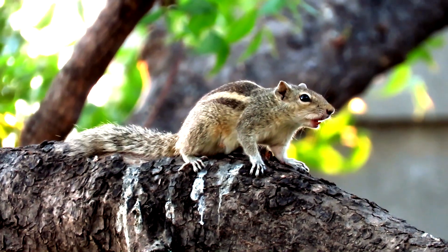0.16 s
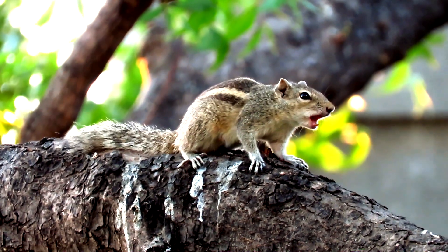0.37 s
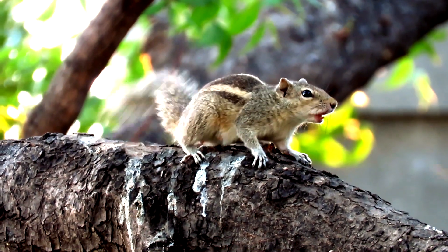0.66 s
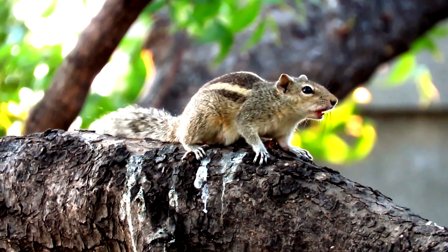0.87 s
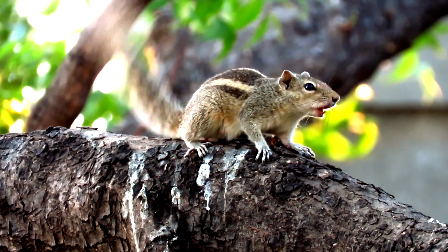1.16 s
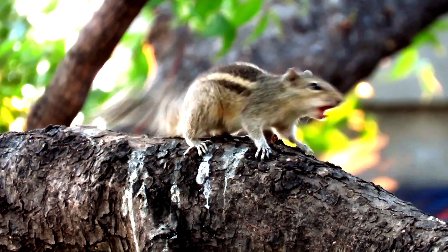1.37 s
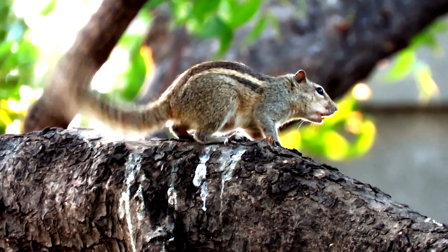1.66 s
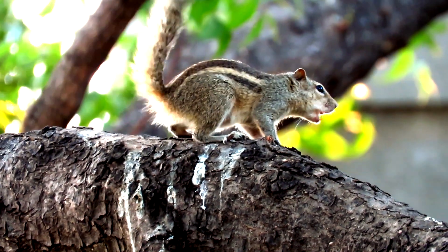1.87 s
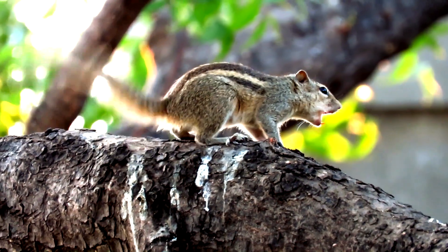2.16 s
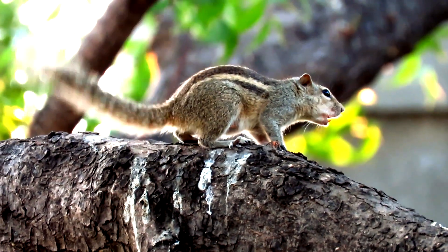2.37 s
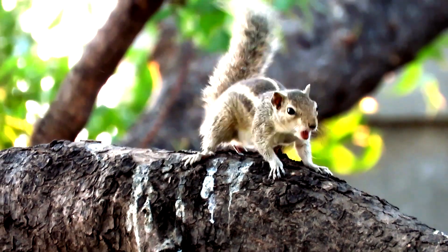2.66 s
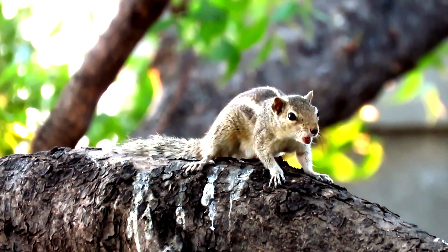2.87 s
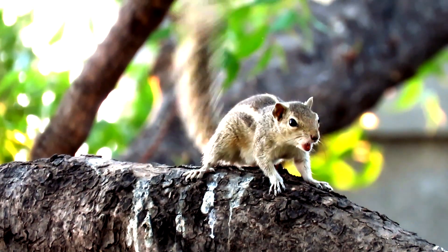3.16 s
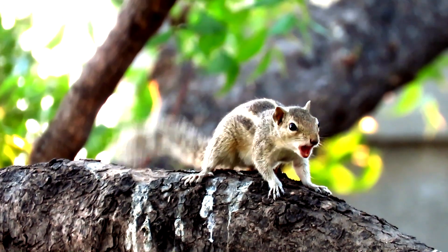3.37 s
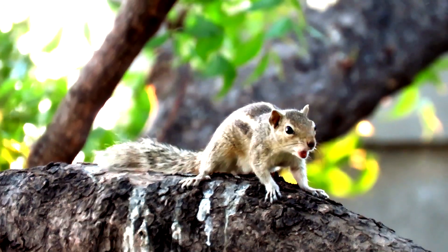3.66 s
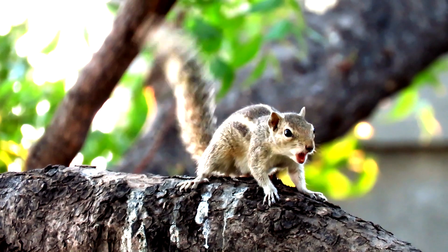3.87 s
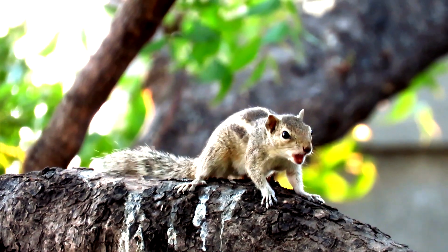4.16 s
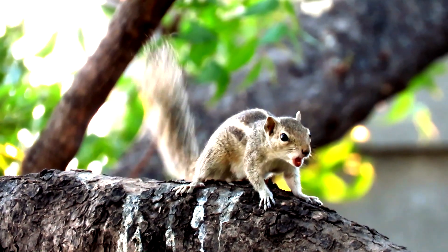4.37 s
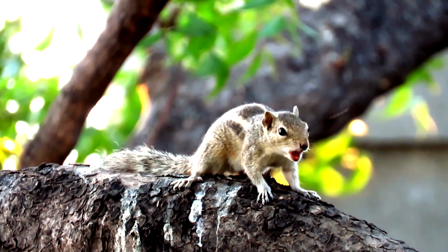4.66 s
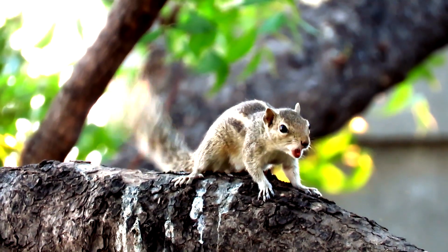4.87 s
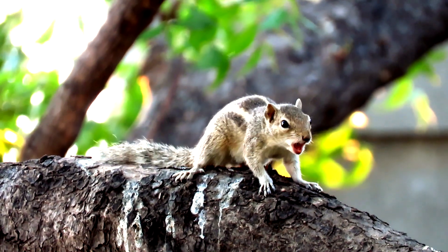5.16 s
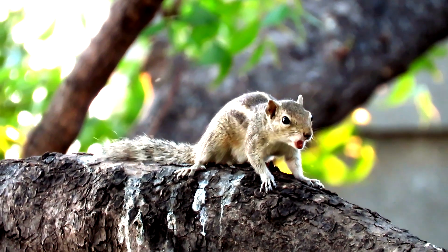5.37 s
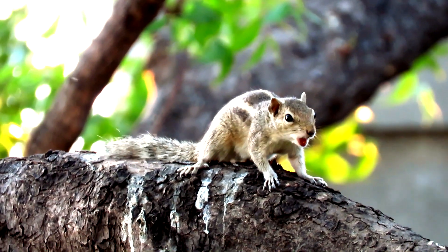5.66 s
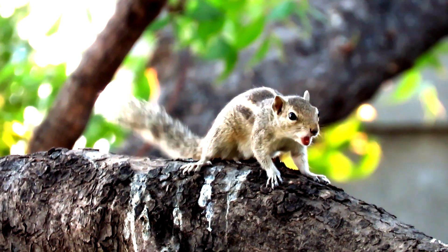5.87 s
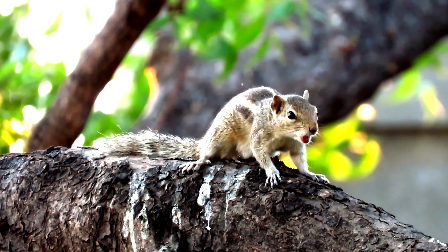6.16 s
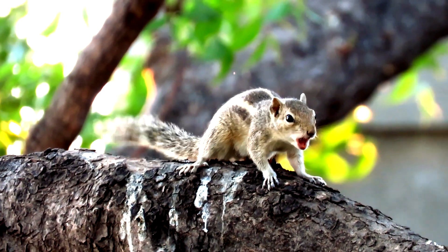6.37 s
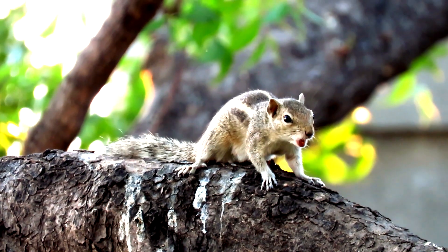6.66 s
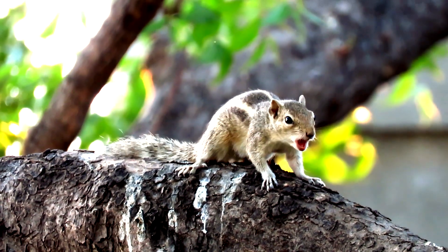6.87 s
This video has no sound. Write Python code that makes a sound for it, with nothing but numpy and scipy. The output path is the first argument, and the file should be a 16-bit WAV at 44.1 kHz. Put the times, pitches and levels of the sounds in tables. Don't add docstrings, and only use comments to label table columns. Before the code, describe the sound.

Close on a branch, a small squirrel repeats short, pure, piercing whistles roughly every half second, slightly slower toward the end. Small throaty gulps follow many of them, and claws brush the bark. Yard walls throw back quick echoes and a bright tail. Several crows caw hoarsely further away, mostly early and again near the end, with a few thin bird peeps. A far engine hums beneath soft street rumble and hiss.

```python
import sys
import numpy as np
from scipy import signal
from scipy.fft import rfft, irfft
from scipy.io import wavfile
from scipy.ndimage import uniform_filter1d

SR = 44100
rng = np.random.default_rng(int(sys.argv[2]) if len(sys.argv) > 2 else 0)


def store_wav(level_fs):
    pcm = np.round(np.clip(np.atleast_2d(level_fs), -1, 1) * 32767)
    wavfile.write(sys.argv[1], SR, pcm.T.astype(np.int16))


def invert_db(level):
    return 10 ** (np.asarray(level, dtype=float) / 20)


N = 309582
TIME = np.arange(N) / SR


def whistles():
    # start in seconds, length in seconds, pitch in Hz, fundamental in dB, octave in dB.
    chirps = [(0.406, 0.15, 4329, -25, -29), (1.015, .15, 4350, -16.5, -21), (1.43, 0.12, 4485, -20.5, -19),
              (1.826, 0.125, 4426, -20.5, -24.5), (2.195, 0.12, 4525, -17.5, -21.5),
              (2.63, 0.13, 4335, -17, -22.5), (3.049, 0.11, 4550, -16.5, -14.5),
              (3.417, 0.12, 4486, -20, -13), (3.826, 0.13, 4449, -20.5, -14),
              (4.269, 0.14, 4404, -21.5, -16), (4.756, 0.14, 4380, -21.5, -18.5),
              (5.223, 0.14, 4365, -19, -20), (5.782, 0.14, 4360, -22, -23), (6.365, 0.14, 4320, -22.5, -26),
              (6.88, 0.15, 4296, -20.5, -25)]
    # crest of fundamental (0-1), its level at the start in dB, crest of octave (0-1),
    # glide as share of pitch, third partial in dB.
    delivery = [(0.9, -4, 0.44, -0.0059, -41), (0.67, -13.5, 0.67, 0.0143, -39.5),
                (0.6, -7.5, 0.44, -0.023, -42), (0.9, -12, 0.63, -0.05, -47.5),
                (0.8, -14, 0.92, 0.0185, -40), (.86, -15, .55, -.002, -47), (0.8, -14, 0.72, 0.0074, -41),
                (0.9, -11.5, 0.8, 0.046, -42.5), (0.82, -10, 0.7, 0.0245, -44),
                (0.9, -9, 0.54, 0.0173, -47.5), (0.47, -17, 0.61, 0.0164, -48.5),
                (0.56, -16, 0.56, 0.0278, -47), (0.44, -16, 0.6, 0.021, -49),
                (0.66, -15.5, 0.54, 0.0132, -47), (0.7, -13.5, 0.57, 0.03, -44)]
    # scoop up to pitch as share, overshoot as share, moment the fundamental falters (0-1),
    # level change there in dB, time constant of the final hook in seconds.
    attacks = [(0.1, 0.0038, 0.45, -7, 0.0154), (0.023, 0.00088, 0.46, -12, 0.0124),
               (0.092, 0.0015, 0.8, 2.5, 0.0235), (0.17, .035, 0.8, 2, 0.0073),
               (0.07, 0.012, 0.65, -6, 0.01245), (.08, .05, .4, -1, .006), (0.11, 0.031, 0.47, -23, 0.016),
               (0.054, 0.0056, 0.4, -6, 0.0157), (0.064, 0.0087, 0.3, -3.5, 0.013),
               (0.062, 0.0069, 0.62, -6.5, 0.0161), (0.098, 0.00065, 0.88, 4, 0.0142),
               (0.081, 0.00072, 0.54, -6.5, 0.0118), (0.09, 0.0037, 0.39, -12, 0.0194),
               (0.0745, 0.00066, 0.6, -14, 0.0123), (.08, .001, 0.7, -8.5, 0.011)]
    # falter length in seconds, final hook as share of pitch, crest of third partial (0-1),
    # its level at start and at end in dB.
    finishes = [(.008, .07, .6, -3, -5), (0.016, .07, .15, -13, -17), (0.0064, 0.0824, .1, -4, -10),
                (.01, 0.064, 0.1, -12, -9), (.008, 0.086, .75, -10, -10), (0.0092, 0.07, 0.3, -18, -23.5),
                (0.018, .09, .7, -18, -4), (0.011, 0.1, 1, -18, -8), (.01, 0.0854, .75, -17, -8),
                (.008, 0.079, 0.1, -6, -7), (.01, 0.071, .2, -8, -7.5), (0.012, 0.089, 0.1, -15, -12.5),
                (0.0093, 0.07, .2, -12, -10), (0.0068, 0.076, 0.03, -12, -8), (.01, .07, 0.15, -5, -6)]
    bearings = [(.4, -.6), (.07, -.35), (0, -.1), (-.2, -.34), (-.28, -.31), (-.2, -.37), (0, -.44),
                (-.29, -.11), (-.05, -.17), (-.08, -.21), (-.43, -.4), (-.32, -.37), (-.2, -.36),
                (.6, -.63), (.4, -.85)]
    # level in dB, time constant in seconds.
    onset = (-17.5, 0.0099)
    offset = (-17, 0.0077)
    scoop_s, overshoot_s = 0.0132, 0.0186
    low_fall_db, octave_rise_db, octave_fall_db = -8, -13, -6.5
    third_spread = .5

    out, side = np.zeros((2, N))
    for chirp, manner, attack, finish, bearing in zip(chirps, delivery, attacks, finishes, bearings):
        s, length, hz, low_db, octave_db = chirp
        crest, lack_db, octave_crest, glide, third_db = manner
        scoop, overshoot, falter, loss_db, hook_s = attack
        falter_s, hook, third_crest, third_start_db, third_end_db = finish
        lead, octave_lead = bearing
        span, (share,), gate = played([(s, 0), (s + length, 1)], fade_s=0.0036)

        surge = share * length / overshoot_s
        bend = 1 + glide * (share - .5) + overshoot * surge * np.exp(1 - surge)
        hz = hz * (bend - edges(share, length, (scoop, scoop_s), (hook, hook_s)))
        phase = turns(hz * (1 + 0.0013 * drift(80, len(hz))))

        breath_db = edges(share, length, onset, offset)
        low_db = low_db + breath_db + arch(share, crest, lack_db, low_fall_db, (.8, 1.1))
        low_db = low_db + loss_db * np.exp(-.5 * ((share - falter) * length / falter_s) ** 2)
        octave_arch_db = arch(share, octave_crest, octave_rise_db, octave_fall_db, (1.1, 1.8))
        octave_db = octave_db + breath_db + octave_arch_db
        third_db = third_db + .4 * breath_db + arch(share, third_crest, third_start_db, third_end_db)

        low = invert_db(low_db + 9.0) * np.exp(1j * phase)
        octave = invert_db(octave_db + 4) * np.exp(2j * phase + 1j)
        third = invert_db(third_db + 5.5) * np.exp(3j * phase)
        out[span] += gate * (low + octave + third).imag
        wander = third_spread * np.exp(3j * drift(15, len(hz)))
        aside = np.tan(lead / 2) * low + np.tan(octave_lead / 2) * octave + wander * third
        side[span] += gate * aside.real
    return out, side


def gulps():
    # start in seconds, level in dB.
    swallows = [
        (.558, -58),
        (1.174, -63),
        (1.556, -43),
        (2.764, -46),
        (3.553, -62),
        (3.96, -32),
        (4.413, -32.5),
        (4.904, -34.5),
        (5.373, -36.5),
        (5.928, -50),
    ]
    rasp_colour = [(3000, -50.0), (5500, 3.5), (8000, -12.0), (12000, -2.5), (14000, -46.5)]  # Hz, dB
    rasp = filtered(rng.standard_normal(N), rasp_colour)
    out = np.zeros(N)
    for s, db in swallows:
        fall = [(s, 2300, -6), (s + 0.01, 1750, 0), (s + .03, 1050, -5)]  # s, Hz, dB
        span, (hz, shape_db), gate = played(fall, fade_s=0.00091)
        phase = turns(hz * (1 + 0.043 * drift(200, len(hz))))
        upper = np.sin(3 * phase) + np.sin(4 * phase) + 2.8 * rasp[span]
        out[span] += gate * invert_db(db + shape_db) * (np.sin(phase) + invert_db(-16.0) * upper)
    return out


def scuffs():
    # start in seconds, length in seconds, level in dB.
    brushes = [
        (1.545, .17, -42),
        (2.75, 0.08, -47),
        (3.934, 0.083, -49),
        (4.426, 0.064, -64),
        (4.936, 0.063, -65),
        (5.58, 0.097, -76),
    ]
    colour = [(2500, -5.5), (4800, 3.5), (6000, 6.5), (8000, -13.0), (13000, -16.0)]  # Hz, dB
    rustle = rms_one(filtered(rng.standard_normal(N), colour))
    swell = np.zeros(N)
    for s, length, db in brushes:
        swell += invert_db(db) * np.sin(np.pi * np.clip((TIME - s) / length, 0, 1) ** 0.09)
    return swell * rustle


def facing_wall(close):
    # frequency in Hz, level in dB.
    wall_colour = [(2500, -22), (4000, -9), (5000, -8), (8000, -25), (14000, -22)]
    delay_s = .039
    return np.pad(filtered(close, wall_colour), (int(delay_s * SR), 0))[:N]


def yard(x, wet_db, side_db):
    # delay in seconds, left level in dB, right level in dB.
    walls = [
        (0.014, -8, -16),
        (.061, -17, -19),
        (.083, -24.5, -20),
    ]
    # band centre in Hz, 60 dB decay time in seconds, level in dB.
    tail_bands = [
        (1444, 1.8, -9),
        (4230, 0.86, 0),
        (8900, 0.6, -15),
        (14040, 0.32, -8),
    ]
    t = TIME[:int(1.2 * SR)]
    reply = np.zeros((2, len(t)))
    for hz, t60, db in tail_bands:
        band = signal.butter(3, [hz / 1.88, min(hz * 1.52, .45 * SR)], "band", fs=SR, output="sos")
        mid, side = signal.sosfilt(band, rng.standard_normal((2, len(t))))
        dying = invert_db(-60 * t / t60) * np.clip(t / 0.0044, 0, 1)
        dying = dying / np.sqrt(np.sum(dying ** 2))
        reply += invert_db(db) * dying * (mid + invert_db(side_db) * side * [[1], [-1]])
    for delay, left_db, right_db in walls:
        reply[:, int(delay * SR)] += invert_db([left_db, right_db])
    reply *= invert_db(wet_db)
    reply[:, 0] += 1
    return signal.fftconvolve(x[None], reply, axes=1)[:, :N]


def crows():
    # start in seconds, length in seconds, voice pitch in Hz, level in dB.
    caws = [(-.04, 0.2, 983, -18.5), (-.04, 0.47, 769, -25), (0.128, .28, 1029, -30),
            (0.491, 0.43, 850, -29), (0.701, 0.35, 1005, -21.5), (0.996, 0.19, 1036, -29.5),
            (1.105, 0.335, 760.7, -29), (1.161, 0.34, 1021, -24), (1.761, 0.34, 822.5, -25.5),
            (1.815, 0.42, 1070, -30), (2.026, 0.37, 839.5, -24), (2.21, 0.5, 715.5, -27),
            (3.11, .48, 720, -29.5), (5.729, 0.47, 772.7, -32.5), (6.062, 0.24, 999, -22),
            (6.2, 0.34, 761, -29.5), (6.199, 0.63, 700.2, -28), (6.683, 0.41, 975, -22),
            (0.562, 0.49, 747, -30.5), (6.74, 0.28, 754, -26.5), (6.459, 0.18, 644, -28),
            (1.16, .28, 613.5, -31)]
    # crest (0-1), share of pitch lacking at start, at end, level at start in dB, at end in dB.
    caw_arches = [(.57, -0.11, 0.083, 1.5, -24), (.3, .001, 0.12, -6, -14), (.29, -.01, .065, 8, -15.5),
                  (.43, -.09, 0.018, -14, 3), (.51, .2, 0.026, -6.5, -15), (0, -0.21, 0.042, -9.5, -11),
                  (0.4, .13, .06, 7, 1), (.17, 0.064, 0.017, -19, -18.5), (.47, 0.37, 0.038, -3.5, -0.5),
                  (0.5, .12, 0.049, -4.5, -36), (.25, .09, 0.025, -28, -23), (.14, .087, .09, 4, -5.5),
                  (.2, .053, .06, -4, -1.5), (.23, -0.12, 0.044, -17.5, 2), (0.6, 0.057, 0.18, -2, -6.5),
                  (0, -0.17, 0.0099, -18, 4), (0.2, 0.07, 0.12, 2.5, -2), (0, 0.094, .147, -34, -13.5),
                  (0.44, .03, 0.059, -4.5, -14), (0.5, -.005, 0.076, 2.5, 1.5), (.4, -.17, .01, -1, -2.5),
                  (0.3, .03, 0.015, -2, -5)]
    # rattle in Hz, pitch swing as share, hoarseness (0-1), beak air in dB.
    caw_voices = [(102.2, 0.08, .45, 6), (66.4, 0.145, 0.77, 9), (70.55, 0.52, 0.6, 15.5),
                  (73.9, 0.045, 0.53, -1.5), (85.1, 0.12, 0.4, -7), (84.6, 0.1, .95, 8), (75, .1, .2, 10),
                  (75, .035, .15, 3), (77.45, 0.12, 0.23, 14.5), (90, 0.16, 0.95, 0), (78, .035, .3, 6),
                  (95, 0.17, 0.54, 17.5), (82.8, 0.18, 0.66, 17.5), (78.1, 0.17, 0.1, 19.5),
                  (86.2, 0.12, 0.6, 8.5), (80, .012, .15, 0), (76.4, 0.2, 0.4, 17.5), (79.4, 0.11, 0.3, 12),
                  (74.3, 0.18, .51, 16.5), (80.2, 0.18, .47, -5), (77.2, .03, .25, -2.5),
                  (74.9, 0.065, .3, -0.5)]
    # fundamental in dB, third harmonic and above in dB.
    caw_colours = [(-8.5, -3.5), (-4, 4.5), (0.5, -11), (-10.5, -5), (-6.5, -1.5), (-3.5, 4.5), (-2, -2.5),
                   (-13.5, 1), (-4.5, -11), (-3.5, 9), (-10, -21), (0, -12), (-0.5, -13), (0.5, -15),
                   (-6, -0.5), (-7, -6.5), (1, -5), (-6, -2), (-3.5, -7), (-5, 1), (-7, -6.5), (-15, -2)]
    caw_leads = [-8, -8, -12, 24, -4, -4, -9, -9, -12, -12, 24, 11, 9, 6, -15, 0, 5, 0, 5, 0, 0, -9]
    caw_bend = (1.4, 1.6)
    caw_swell = (1.2, 3.4)
    # rate as share, depth in dB, level in dB.
    rate_jitter, depth_jitter_db, level_jitter_db = (.02, 1.5, .6)
    # frequency in Hz, level in dB.
    throat = [(450, -50.5), (600, -9.5), (900, 1), (1080, -7), (1300, 4), (2000, 5), (2350, -7.5),
              (2700, -24), (4000, -30), (8000, -28)]
    # frequency in Hz, level in dB.
    beak = [(1000, -19.5), (2000, -4.5), (2600, -30), (3100, -42.5), (4000, -31.5), (4500, -25),
            (4750, -30), (5200, -21), (5550, -34), (9000, -32.5), (12300, -40.5), (13500, -64.5)]

    voices, air, leading = np.zeros((3, N))
    for caw, shape, timbre, colour, lead_us in zip(caws, caw_arches, caw_voices, caw_colours, caw_leads):
        s, length, hz, db = caw
        crest, scoop, sag, start_db, end_db = shape
        rattle_hz, swing, hoarse, air_db = timbre
        low_db, high_db = colour
        span, (share,), gate = played([(s, 0), (s + length, 1)], fade_s=.045)

        hz = hz * (1 - arch(share, crest, scoop, sag, caw_bend))
        db = db + arch(share, crest, start_db, end_db, caw_swell)
        height = hz / hz.max()
        rattle = turns(rattle_hz * height * (1 + rate_jitter * drift(18.4, len(hz))))
        swing = swing * invert_db(depth_jitter_db * drift(15, len(hz))) * height ** 2
        rough = hoarse * .026 * drift(150, len(hz))
        phase = turns(hz * (1 + swing * np.sin(rattle) + rough))

        upper = np.cos(phase[:, None] * np.arange(3, 9)).sum(axis=1)
        voice = invert_db(low_db) * np.cos(phase) + np.cos(2 * phase) + invert_db(high_db) * upper
        level = invert_db(db + level_jitter_db * drift(19, len(hz)))
        pulsing = gate * level * (1 + 0.22 * np.cos(rattle))
        voices[span] += pulsing * voice
        leading[span] += np.gradient(pulsing * voice) * SR * lead_us / 2e6
        air[span] += pulsing * invert_db(air_db) * rng.standard_normal(len(hz)) * (1 + np.cos(phase))
    return filtered(voices, throat) + filtered(air, beak), filtered(leading, throat)


def small_bird():
    # start in seconds, length in seconds, top pitch in Hz, level in dB, moment of the top as share.
    pipes = [
        (1.1, .09, 2500, -38, -.2),
        (1.152, .12, 3000, -38, .52),
        (1.32, .12, 3000, -47, .55),
        (1.62, .11, 3250, -48, .65),
        (1.8, .08, 3060, -44, .8),
    ]
    # start in seconds, length in seconds, start pitch in Hz, end pitch in Hz, level in dB.
    chips = [
        (1.04, .03, 3600, 3200, -46),
        (1.69, .03, 3300, 2700, -48),
        (2.122, .045, 3700, 2850, -42),
        (2.14, .035, 3600, 2900, -48),
        (2.28, .025, 3100, 2500, -45),
        (2.475, .03, 3300, 2700, -50),
        (2.505, .025, 3000, 2500, -48),
    ]
    bend_hz_per_s2, sag_share = 120000, .3
    edge_db, flutter_db = -4, 4
    out = np.zeros(N)
    for s, length, hz, db, top in pipes:
        span, (share,), gate = played([(s, 0), (s + length, 1)], fade_s=0.004)
        bend = bend_hz_per_s2 * np.where(share < top, 1, sag_share)
        hz = hz - bend * ((share - top) * length) ** 2
        db = db + arch(share, 0.4, edge_db, edge_db, (1.5, 1.5)) + flutter_db * drift(31, len(hz))
        out[span] += gate * invert_db(db) * np.sin(turns(hz * (1 + 0.0088 * drift(73, len(hz)))))
    for s, length, start_hz, end_hz, db in chips:
        span, (share,), gate = played([(s, 0), (s + length, 1)], fade_s=0.0024)
        hz = end_hz + (start_hz - end_hz) * (1 - share) ** 1.1
        out[span] += gate * invert_db(db + arch(share, .65, -9, -4)) * np.sin(turns(hz))
    return out


def engine():
    # frequency in Hz, level in dB rms.
    orders = [(60, -65), (80.5, -40.5), (104, -47.5), (122, -45.5), (199, -47), (252, -44), (273, -49)]
    out = np.zeros(N)
    for hz, db in orders:
        level = invert_db(db + 2.5 + 1.4 * drift(2.5, N))
        out += level * np.sin(turns(hz + 1.2 * drift(2.69, N)))
    return out


def street():
    # frequency in Hz, level in dB per Hz.
    spectrum = [(20, -30), (50, -10), (100, -4.5), (250, 0.5), (340, -7), (550, -15.5), (820, -10.5),
                (1150, -16.5), (2100, -18.5), (2550, -22), (3400, -23), (5000, -32), (8500, -37.5),
                (11000, -49.5), (14500, -51.5)]
    # frequency in Hz, side minus mid in dB.
    spread = [(60, -51), (110, -22), (200, -16.5), (370, -5), (680, -6.5), (1250, -10.5), (2300, -10.5),
              (4220, -11), (7750, 7.5), (14200, 12)]
    mid = filtered(rng.standard_normal(N), spectrum)
    side = filtered(filtered(rng.standard_normal(N), spectrum), spread)
    return invert_db(-37.5 + .5 * drift(0.67, N)) * rms_one(mid + side * [[1], [-1]])


def filtered(x, points):
    hz, db = np.transpose(points)
    bins = np.maximum(np.fft.rfftfreq(x.shape[-1], 1 / SR), 1)
    gain = invert_db(np.interp(np.log(bins), np.log(hz), db))
    return irfft(rfft(x) * gain, x.shape[-1])


def rms_one(x):
    return x / np.sqrt(np.mean(x ** 2) + 1e-20)


def drift(rate_hz, size):
    r = np.exp(-2 * np.pi * rate_hz / SR)
    noise = rng.standard_normal(size + 9000)
    return rms_one(signal.lfilter([1], [1, -2 * r, r * r], noise)[9000:])


def played(rows, fade_s):
    s, *columns = np.transpose(rows)
    span = slice(int(max(s[0], 0) * SR), int(min(s[-1] * SR, N)))
    t = TIME[span]
    width = max(int(fade_s * SR), 1)
    gate = np.clip(np.minimum(t - s[0], s[-1] - t) / fade_s, 0, 1)
    curves = [uniform_filter1d(np.interp(t, s, c), width, mode="nearest") for c in columns]
    return span, curves, gate


def turns(hz):
    return 2 * np.pi * np.cumsum(hz) / SR


def arch(share, crest, start, end, powers=(1, 1)):
    crest = np.clip(crest, .02, .98)
    before = np.clip(1 - share / crest, 0, 1) ** powers[0]
    after = np.clip((share - crest) / (1 - crest), 0, 1) ** powers[1]
    return start * before + end * after


def edges(share, length, first, last):
    early = first[0] * np.exp(-share * length / first[1])
    late = last[0] * np.exp((share - 1) * length / last[1])
    return early + late


def scene():
    close, close_side = whistles()
    close = close + gulps() + scuffs()
    echo = facing_wall(close)
    near = yard(close, wet_db=-7.5, side_db=-8.0) + echo * invert_db([[-2.5], [1.8]])
    late = int(.235 * SR)
    near[:, late:] += invert_db(-9) * uniform_filter1d(echo, size=4)[:-late]
    caws, caws_side = crows()
    far = yard(caws + small_bird(), wet_db=-7, side_db=-5)
    return near + far + (close_side + caws_side) * [[1], [-1]] + engine() + street()


def masked(x):
    margin_db, slope_db, lowest_hz = (34, 11, 4800)
    hz, _, frames = signal.stft(x, SR, nperseg=2048)
    bands = frames[:, :1024].reshape(2, 32, 32, -1)
    centre = hz[16:1024:32]
    level = 10 * np.log10(np.sum(np.abs(bands) ** 2, axis=2).mean(axis=0) + 1e-20)
    octaves = np.log2(centre[:, None] / centre)
    masks = (octaves > 0) & (centre > 3500)
    reach = np.where(masks, -margin_db - slope_db * octaves, -200)
    threshold = (level[None] + reach[..., None]).max(axis=1)
    threshold += 8.3 * rng.standard_normal(threshold.shape)
    kept = np.clip((level - threshold) / 2, 0, 1)
    kept[centre < lowest_hz] = 1
    frames[:, :1024] = (bands * kept[None, :, None]).reshape(2, 1024, -1)
    return signal.istft(frames, SR, nperseg=2048)[1][:, :N]


def roll_off(x):
    return signal.sosfilt(signal.butter(12, 14830, fs=SR, output="sos"), x)


def record(dry):
    mix = masked(dry)
    return roll_off(mix)


dry = scene()
out = record(dry)
store_wav(out)
```